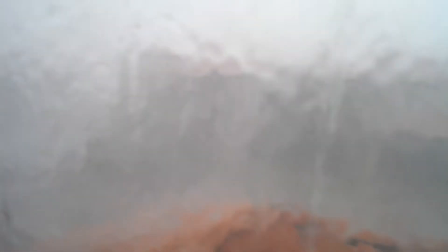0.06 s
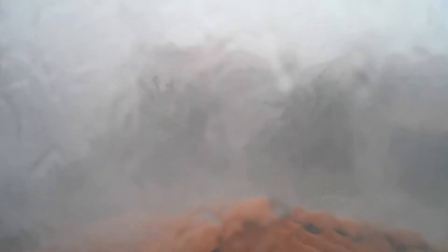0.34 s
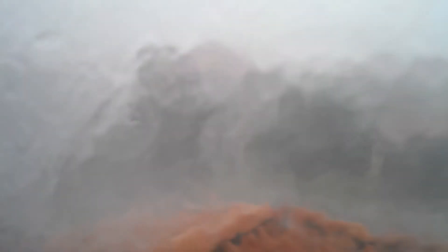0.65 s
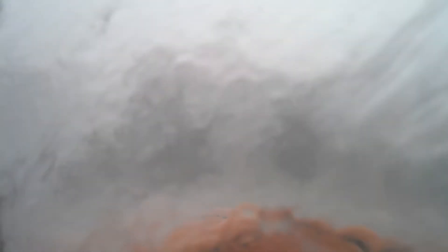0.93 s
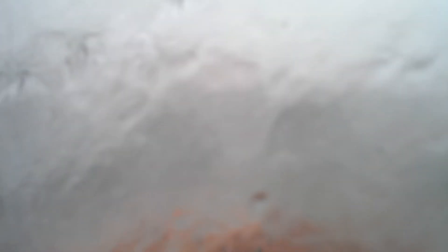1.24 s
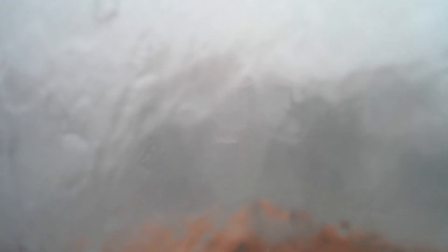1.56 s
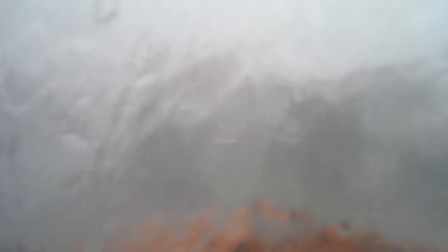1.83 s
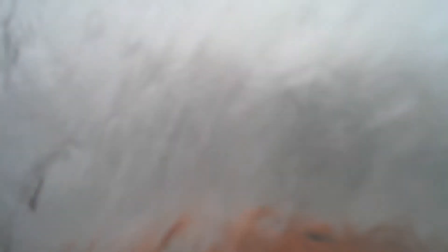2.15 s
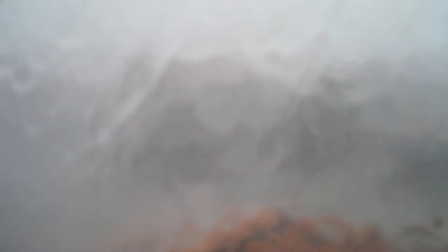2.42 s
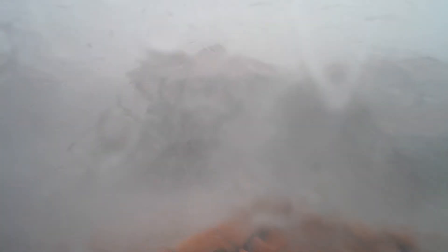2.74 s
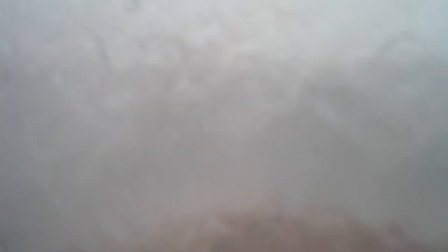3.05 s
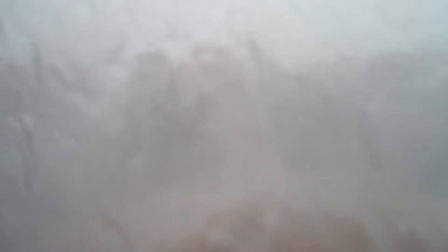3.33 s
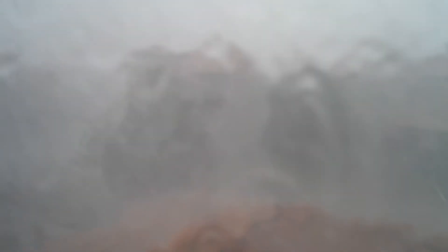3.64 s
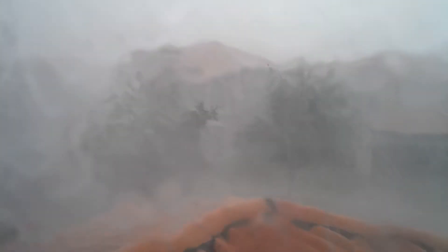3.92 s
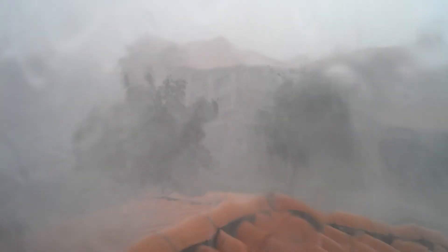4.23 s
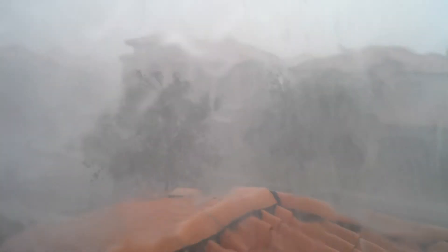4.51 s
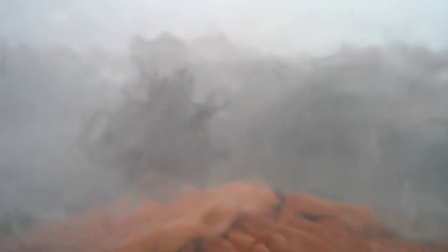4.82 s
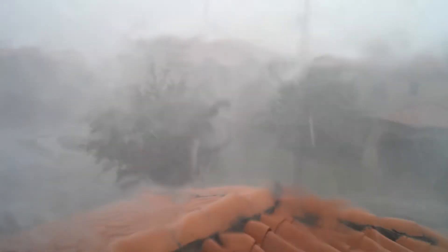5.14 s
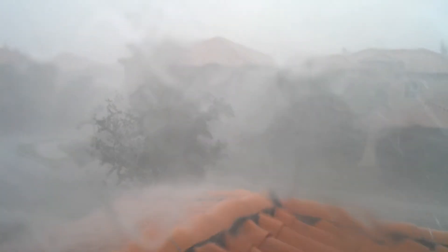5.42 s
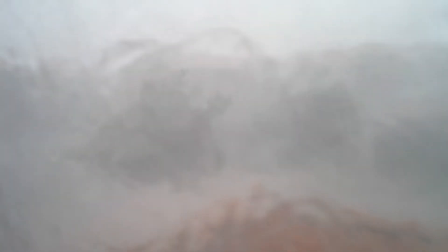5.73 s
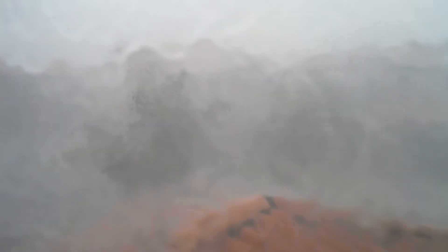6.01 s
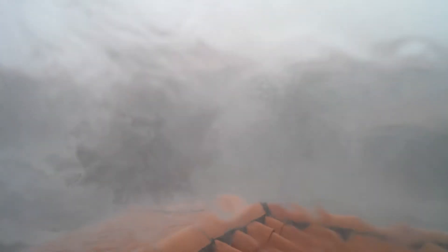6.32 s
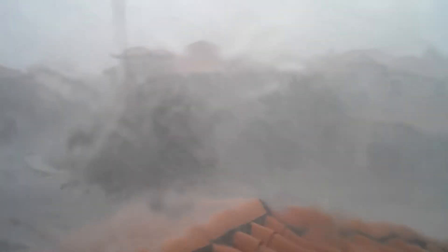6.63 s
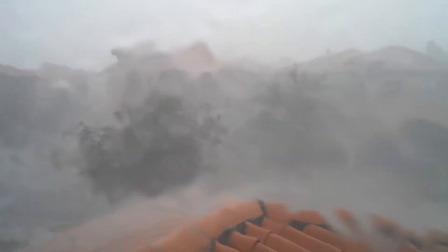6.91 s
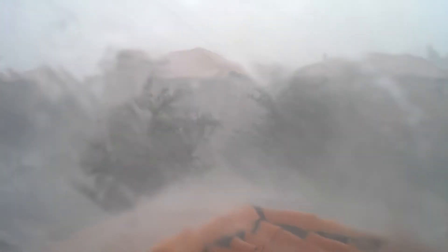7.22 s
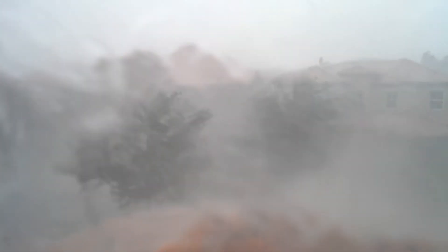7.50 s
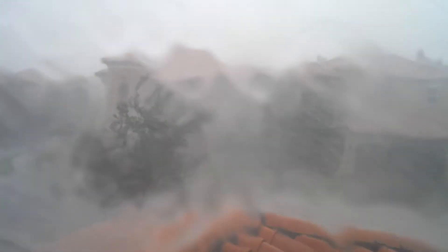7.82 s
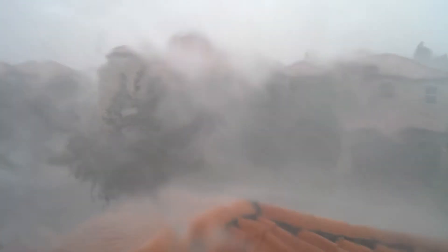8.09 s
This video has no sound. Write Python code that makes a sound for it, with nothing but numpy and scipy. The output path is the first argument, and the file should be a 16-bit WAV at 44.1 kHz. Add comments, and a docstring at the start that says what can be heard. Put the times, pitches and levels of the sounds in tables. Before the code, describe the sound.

Heavy rain washes against a window in surges under a continuous wind roar, heard by a stereo microphone just inside the glass. Sharp hail knocks come singly or in small clusters, with occasional dull thumps on the frame and roof. Two big gusts drive the rain harder, the second with a short howl at the eaves. Afterwards the rain thins and separate drops tap brightly on the pane.

```python
"""Indoors, close behind a window in a storm. Wind roars over the roof, booms in the building and howls
at the eaves; gusts fling sheets of rain at the glass. Heavy drops tick on the pane, a few hailstones
knock on it and dull blows land on frame and roof. Pane and room colour the roar and the rain.
A small stereo recorder stands close to the glass and widens its two microphone signals."""
import sys
import numpy as np
from scipy import signal
from scipy.fft import rfft, irfft, next_fast_len
from scipy.io import wavfile
from scipy.ndimage import uniform_filter1d, map_coordinates

SR = 44100
rng = np.random.default_rng(int(sys.argv[2]) if len(sys.argv) > 2 else 0)


def store_wav(level_fs):
    """Save 16-bit WAV to argv[1]."""
    pcm = np.round(np.clip(np.atleast_2d(level_fs), -1, 1) * 32767)
    wavfile.write(sys.argv[1], SR, pcm.T.astype(np.int16))


N = 368676

# A drop ticking on glass. Each row: frequency in Hz, relative level in dB.
TICK_SPECTRUM = [(50, -45), (500, -13), (2500, -15), (6000, -13), (8000, -2), (9300, 0), (11000, -3),
                 (13000, -10), (15500, -16)]


def amp(db):
    """Decibels to gain."""
    return 10 ** (np.asarray(db) / 20)


def unit(x):
    """x scaled to rms 1."""
    return x / np.sqrt(np.mean(x ** 2) + 1e-20)


def along(points, hz):
    """Rows of frequency and value, read at hz on a log axis."""
    knots_hz, values = np.transpose(points)
    return np.interp(np.log(hz + 1), np.log(knots_hz + 1), values)


def over_time(points):
    """Rows of seconds and value, read at every sample."""
    return np.interp(np.arange(N) / SR, *np.transpose(points))


def wobble(rate):
    """A smooth random curve, rate knots a second."""
    knots = rng.standard_normal(int(N * rate / SR) + 4)
    return map_coordinates(knots, [np.arange(N) * rate / SR])


def filtered(x, response):
    """x through a filter whose gain is response(hz)."""
    n = x.shape[-1]
    size = next_fast_len(n + 4096)
    return irfft(rfft(x, size) * response(np.fft.rfftfreq(size, 1 / SR)), size)[..., :n]


def bump(hz, centre, width):
    """The shape of one resonance, 1 at its centre."""
    return 1 / (1 + (2 * (hz - centre) / width) ** 2)


def add(track, start_s, sound):
    """Mixes a sound into the track."""
    part = track[:, max(round(start_s * SR), 0):][:, :sound.shape[1]]
    part += sound[:, :part.shape[1]]


def indoors(x, spectrum):
    """x shaped by a spectrum and heard through the resonances of pane and room; rms 1."""
    # Each row: centre in Hz, width in Hz, lift in dB.
    resonances = [(109.6, 16, 7.5), (168.3, 36, 5), (243.5, 10.4, 5.5), (338, 23, 4), (488, 104, 6.5),
                  (657, 44, 5.5), (756, 51, 6), (921, 57, 5.5), (1057, 44, 6), (1540, 48, 1.5),
                  (1782, 74, 5.5), (1784, 460, -8), (2365, 106, 5.5)]
    lift_db = lambda hz: sum(db * bump(hz, centre, width) for centre, width, db in resonances)
    return unit(filtered(x, lambda hz: amp(along(spectrum, hz) + lift_db(hz))))


def rush(patchy_db):
    """Two noises whose level varies in patches over time and frequency."""
    spectra = signal.stft(rng.standard_normal((2, N)), nperseg=512)[2]
    patches = uniform_filter1d(rng.standard_normal(spectra.shape[1:]), size=6, axis=0)
    patches = unit(uniform_filter1d(patches, size=12, axis=1))
    return unit(signal.istft(spectra * amp(patchy_db * patches), nperseg=512)[1][:, :N])


def resonant_noise(pitch_hz, width_hz):
    """Two noises in one resonance whose centre follows pitch_hz."""
    phase = 2 * np.pi * np.cumsum(pitch_hz) / SR
    a, b = unit(filtered(rng.standard_normal((2, 2, N)), lambda hz: bump(hz, 0, width_hz)))
    return a * np.cos(phase) + b * np.sin(phase)


def patter(rate, spread_db, t60=.015):
    """Impacts at random moments, about rate a second, each a burst of noise that dies away."""
    size = amp(spread_db * np.minimum(rng.exponential(size=N), 4))
    energy = (rng.random(N) < rate / SR) * size ** 2
    power = signal.lfilter([1], [1, -amp(-120 / (t60 * SR))], energy)
    return unit(np.sqrt(power) * rng.standard_normal((2, N)))


def wind():
    """The turbulent roar over roof and walls, and the low boom of the building under its pressure."""
    # Spectra. Each row: frequency in Hz, relative level in dB.
    roar_spectrum = [(25, -39), (50, -35), (70, -18), (100, -12), (150, -4.5), (300, 1.5), (500, -5.5),
                     (800, -10), (1300, -18.5), (3000, -59), (8000, -55)]
    boom_spectrum = [(25, -42), (55, -30), (85, -13.5), (115, 0.5), (135, -5), (155, -5), (220, -4.5),
                     (400, -57)]
    # Slow swells. Each row: time in seconds, relative level in dB.
    roar_swell = [(0, -37), (.6, -38), (1.1, -35), (1.58, -38.5), (1.8, -33.5), (2.45, -33.5), (2.8, -30),
                  (3.1, -31), (3.65, -28), (3.95, -30.5), (4.4, -29.5), (4.75, -31), (5.5, -26.5),
                  (6.1, -33), (6.33, -28.5), (6.47, -37.5), (8.36, -31.5)]
    boom_swell = [(0, -53), (.7, -45.5), (1.3, -51), (2.2, -44.5), (3.7, -47), (4.2, -40), (4.8, -43),
                  (5.35, -41), (5.9, -47), (6.5, -56.5), (7.5, -48.5), (8.36, -44)]
    roar_db = over_time(roar_swell) - 3 + .073 * wobble(11)
    roar = indoors(rush(patchy_db=.7), roar_spectrum)
    boom = unit(filtered(rush(patchy_db=1.1), lambda hz: amp(along(boom_spectrum, hz))))
    return amp(roar_db) * roar + amp(over_time(boom_swell)) * boom


def downpour():
    """Levels of drumming, hiss and fizz in dB: each gust adds a sheet of water to the steady rain."""
    # Rain between gusts. Each row: time in seconds, then drumming, hiss and fizz in dB.
    steady_rain = [(0.0, -30, -39, -44), (0.62, -39, -49.5, -60.5), (1.6, -41, -48.5, -63),
                   (2.42, -40.5, -47.5, -62), (2.8, -28.5, -40, -45.5), (3.8, -27.5, -38, -43.5),
                   (4.401, -26.5, -36.5, -44.5), (4.5, -32, -39.5, -53), (4.849, -36, -38, -51.5),
                   (5.2, -38, -45, -58.5), (5.45, -29, -40.5, -52), (5.95, -35.5, -44, -55),
                   (6.55, -41.5, -51, -63), (6.752, -39, -48.5, -57), (7.25, -35, -45, -52.5),
                   (7.65, -38, -45.5, -52.5), (8.36, -33.5, -46.5, -53.5)]
    # Each row: time of full force in seconds, drumming in dB, hold in seconds.
    gusts = [(0.141, -30.5, 0.2), (0.752, -38.5, 0.1287), (1.011, -32, 0.45), (1.729, -27.5, 0.02435),
             (1.923, -34.0, 0.14), (2.222, -37, 0.055), (2.62, -35, 0.068), (3.27, -21, 0.039),
             (3.418, -27.5, 0.28), (4.414, -31, 0.018), (5.552, -19.5, 0.0261), (5.685, -21, 0.0582),
             (5.835, -25.5, 0.13), (6.104, -30.5, 0.0206), (6.258, -29.5, 0.061), (7.094, -41, 0.1245)]
    rise_db_per_s, drain_db_per_s = 241, 95.5  # a sheet arrives fast and drains more slowly
    shares_db = (0, -9, -16)  # a sheet's drumming, hiss and fizz
    t = np.arange(N) / SR
    gust_power = np.zeros(N)
    for full_s, db, hold_s in gusts:
        rising_db = rise_db_per_s * np.maximum(full_s - t, 0)
        draining_db = drain_db_per_s * np.maximum(t - full_s - hold_s, 0)
        gust_power += amp(db - rising_db - draining_db) ** 2
    times, *steady_db = np.transpose(steady_rain)
    return [10 * np.log10(amp(np.interp(t, times, db)) ** 2 + gust_power * amp(share_db) ** 2)
            for db, share_db in zip(steady_db, shares_db)]


def rain(sheet_db, hiss_db, fizz_db):
    """Sheets of water drum and ring on the glass; spray hisses, mist fizzes and small drops tick."""
    # Spectra. Each row: frequency in Hz, relative level in dB.
    sheet_spectrum = [(25, -65), (100, -19), (160, -5), (250, -4.5), (500, 2), (900, -1.5), (1170, -2.5),
                      (1550, 3.5), (2400, -0.5), (3000, 0), (3800, -16.5), (5000, -11), (8000, -54),
                      (15000, -57)]
    spray_spectrum = [(100, -56), (2000, -34), (3600, 2.5), (5000, 1.5), (6500, 1), (7600, -3),
                      (9500, -20.5), (15000, -37)]
    mist_spectrum = [(300, -60), (5000, -31), (7000, -10), (8100, 8), (9500, 4.5), (11000, -3.5),
                     (12200, -6), (13300, -15), (14600, -12), (15500, -28)]
    drumming = unit(rush(patchy_db=2.5) + amp(-1) * patter(rate=970, spread_db=0))
    spray = unit(rush(patchy_db=1.5) + amp(-4) * patter(rate=900, spread_db=2.6))
    mist = unit(rush(patchy_db=1.5) + amp(-7.5) * patter(rate=800, spread_db=2.7))
    flutter = wobble(14)  # eddies shake all the water together
    sheets = amp(sheet_db + .68 * flutter) * indoors(drumming, sheet_spectrum)
    # The harder the water hits, the higher it rings.
    splash_hz = 1587 + 25 * (sheet_db - sheet_db.mean()) + 69.8 * wobble(6)
    splash = amp(sheet_db - 16) * resonant_noise(splash_hz, width_hz=500)
    hiss = amp(hiss_db + .5 * flutter) * indoors(spray, spray_spectrum)
    fizz = amp(fizz_db + 1.8 * flutter) * indoors(mist, mist_spectrum)
    ticks = amp(-65.5) * indoors(patter(rate=14, spread_db=2.8, t60=.025), TICK_SPECTRUM)
    return sheets + splash + hiss + fizz + ticks


def window_recess(x, echo_db, count=8):
    """The window frame and nearby walls return weak early copies of the treble."""
    delays_s = rng.uniform(.002, .022, count)
    taps = np.bincount((delays_s * SR).astype(int), rng.choice([-1, 1], count))
    echoes = signal.fftconvolve(x, taps[None], axes=1)[:, :N]
    return x + amp(echo_db) * filtered(echoes, lambda hz: hz ** 2 / (hz ** 2 + 1500 ** 2))


def glass_impact(colour_db, t60, room_db, room_t60):
    """A snap of contact, the dense modes of the glass dying fast, and a faint answer from the room."""
    snap_db, snap_t60, rise_s = 4, .0032, .0002
    t = np.arange(SR // 8) / SR
    modes = unit(filtered(rng.standard_normal((2, len(t))), lambda hz: amp(colour_db(hz))))
    decay = amp(snap_db - 60 * t / snap_t60) + amp(-60 * t / t60) + amp(room_db - 60 * t / room_t60)
    hit = modes * decay * (1 - np.exp(-t / rise_s))
    return hit / np.std(hit[:, :SR // 250])  # rms 1 over the first 4 ms


def heavy_drops():
    """Heavy drops slap the pane, all near one bright pitch, some with less sparkle than others."""
    # Each row: start in seconds, then overall level, slap and sparkle in relative dB.
    drops = [(0.1803, -23, 7, -10), (0.826, -35, -3, -5), (1.991, -30, 16, -4), (2.516, -29.5, 5, -8),
             (2.7496, -29, -4, -10), (2.899, -20, -3, -10), (3.4795, -22, -12, -10), (4.4928, -31, 4, -10),
             (4.828, -26, 1, -2), (5.3383, -21, 17, -12), (5.5224, -19, 19, -10), (5.5424, -19, 3, -14),
             (5.84, -15, -9, -20), (6.2957, -32, 8, -8), (6.459, -28, -5, -4), (6.4747, -26.5, 4, -5),
             (6.593, -34, 5, -5), (6.682, -39, -9, 3), (6.7646, -42, -4, -2), (6.857, -27, 2, -3),
             (6.9687, -29.5, 2, -3), (6.981, -36, -12, -8), (7.1093, -26.5, -14, 0), (7.2839, -29, 5, -3),
             (7.3337, -31, -4, 0), (7.3656, -28, -18, -10), (7.4873, -28, 5, -1), (7.5327, -28.5, -15, 0),
             (7.5628, -24.5, 3, -4), (7.662, -35, -12, -10), (7.7635, -17, -45, -4), (7.832, -32, -9, -8),
             (7.8555, -36, -2, -8), (7.99, -30, 3, -4), (8.0513, -23.5, -20, -9), (8.1965, -26.5, -2, -5),
             (8.212, -33, -13.5, 5), (8.3255, -33, 2, -10)]
    out = np.zeros((2, N))
    for start_s, db, slap_db, sparkle_db in drops:
        pitch_hz = 8350 * (1 + .04 * rng.standard_normal())
        tilt = [(4500, slap_db + 11), (8000, 0), (10000, 0), (11300, sparkle_db)]
        colour_db = lambda hz: along(TICK_SPECTRUM, hz) + along(tilt, hz) + 3 * bump(hz, pitch_hz, 1500)
        tick = glass_impact(colour_db, t60=.016, room_db=-15, room_t60=.06)
        add(out, start_s, amp(db - 6.5) * tick)
    return out


def hail():
    """Each stone cracks on the glass and rings one mode above all, that of the spot it strikes."""
    # Each row: start in seconds; overall level, thud, body and crack in relative dB;
    # ring pitch in Hz, ring level against the knock in dB, the knock's t60 in seconds.
    stones = [(0.656, -12, 3, -7.5, -23, 1500, -5, .04), (1.1124, -7.5, -9, -8, -15, 3930, -7, 0.028),
              (1.171, -9.5, -21, -2, -16, 3890, -5.5, 0.035),
              (2.9558, -22.5, -11, -24, -21, 6400, -3, .025), (3.0351, -9.5, -9, 0, -20, 2200, -2, 0.052),
              (3.0615, -21, -15, -30, -25, 6350, 1, .03), (4.5656, -8.5, -2, -11, -24.5, 1760, -3.5, 0.038),
              (4.615, -28, -15, -22, -30, 6640, -3, .025), (4.6938, -26.5, -15, -24, -30, 6600, 0, .025),
              (4.7916, -12, -3, -5, -13, 4000, -8, 0.032), (6.329, -18, -17, -14, -12, 6400, -6, 0.027),
              (6.3895, -4, -7.5, -10.5, -24, 4300, -3.5, 0.028),
              (6.9888, -23.5, -2, -4, -26, 3000, 0, 0.038), (7.061, -21, -19, -12, -34, 6800, -7, 0.024)]
    # The pane radiates little deep bass. Each row: frequency in Hz, relative level in dB.
    knock_spectrum = [(30, -50), (120, -24), (400, 20), (1200, 6), (2200, 7.5), (5000, 7.5), (8000, 3.5),
                      (11000, -6), (15500, -21)]
    out = np.zeros((2, N))
    for start_s, db, thud_db, body_db, crack_db, ring_hz, ring_db, t60 in stones:
        tilt = [(200, thud_db - 6), (900, thud_db + .5), (2300, body_db + 11),
                (5000, 0), (9000, crack_db + 23.5)]
        colour_db = lambda hz: along(knock_spectrum, hz) + along(tilt, hz)
        knock = glass_impact(colour_db, t60, room_db=-32, room_t60=.07)
        t = np.arange(knock.shape[1]) / SR
        ring = np.sin(2 * np.pi * ring_hz * t) * amp(ring_db - 60 * t / (.92 * t60))
        add(out, start_s, amp(db - 8) * (knock + ring))
    return out


def thumps():
    """Blows on frame and roof arrive without their treble: each is one hollow, damped resonance."""
    # Each row: start in seconds, level in dB, pitch in Hz, width in Hz, t60 in seconds.
    blows = [(0.705, -32, 654, 160, 0.05), (1.764, -29.5, 185, 60, 0.17), (2.309, -30.5, 920, 450, 0.06),
             (4.583, -26.5, 600, 700, 0.017), (4.678, -30, 600, 350, 0.039), (5.536, -18, 794, 1415, 0.075),
             (7.066, -30, 794, 900, 0.083), (7.076, -28, 474, 446, 0.1)]
    out = np.zeros((2, N))
    t = np.arange(SR // 6) / SR
    onset = 1 - np.exp(-t / .002)
    for start_s, db, pitch_hz, width_hz, t60 in blows:
        hollow = lambda hz: bump(hz, pitch_hz, width_hz) * hz ** 2 / (hz ** 2 + 250 ** 2)
        blow = filtered(rng.standard_normal((2, len(t))), hollow) * amp(-60 * t / t60) * onset
        add(out, start_s, amp(db) * blow / np.std(blow[:, :SR // 100]))
    return out


def howl():
    """Two strong gusts swell a broad, hollow resonance at the eaves, whose pitch drifts."""
    # Each row: time in seconds, pitch in Hz, level in dB.
    course = [(2.4, 740, -45), (3.2, 801, -38.5), (3.7, 767, -45), (4.3, 789, -33), (4.701, 704, -73),
              (5.401, 517.8, -46), (5.58, 498, -26), (5.85, 515, -53), (6.2, 485, -62)]
    times, pitch_hz, db = np.transpose(course)
    t = np.arange(N) / SR
    return amp(np.interp(t, times, db)) * resonant_noise(np.interp(t, times, pitch_hz), width_hz=170)


def microphone_pair(sound):
    """Two microphones close together hear partly the same sound."""
    # Each row: frequency in Hz, likeness of left and right from 0 to 1.
    likeness = [(60, 0.078), (300, 0.62), (600, 0.61), (2000, 0.16), (10000, 0.68)]
    shares = lambda hz: np.sqrt([(1 + along(likeness, hz)) / 2, (1 - along(likeness, hz)) / 2])
    common, apart = filtered(sound, shares)
    return np.array([common + apart, common - apart])


def scene():
    """The storm from just inside the window: rain and hail close up, wind overhead."""
    water = window_recess(rain(*downpour()), echo_db=-23)
    low_cut = signal.butter(3, 170, "highpass", fs=SR, output="sos")
    impacts = signal.sosfilt(low_cut, heavy_drops() + hail() + thumps())
    return microphone_pair(wind() + howl() + water + impacts)


def record(dry):
    """The recorder deals alternate bands to mid and side, clips at full scale and cuts the top steeply."""
    # Stereo width. Each row: frequency in Hz, relative side gain in dB.
    side_gain = [(60, -9), (130, -5), (270, -0.5), (400, -2), (520, -5), (750, -6.5), (1050, 2.5),
                 (1500, 3), (2000, 3.5), (3000, -2), (4600, 2), (5600, -1.5), (8000, .5)]
    # Balance. Each row: frequency in Hz, lean to the left in dB.
    lean = [(160, .15), (215, .26), (300, -.99), (700, -.88), (1100, -.14)]
    comb_hz, top_hz = 2605, 15550

    def widen(hz):
        """The comb of a short delay, held flat in the bass."""
        angle = np.pi * np.maximum(hz / comb_hz, 1 / 4)
        return np.sqrt(2) * np.array([-1j * np.sin(angle), np.cos(angle) * amp(along(side_gain, hz))])

    mid, side = filtered(dry, widen)
    pair = np.array([mid + side, mid - side])
    pair = filtered(pair, lambda hz: amp([along(lean, hz), -along(lean, hz)]))
    return filtered(np.clip(pair, -1, 1), lambda hz: 1 / np.sqrt(1 + (hz / top_hz) ** 160))


dry = scene()
out = record(dry)
store_wav(out)
```